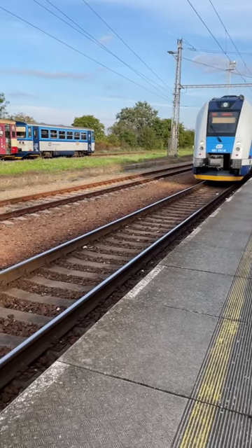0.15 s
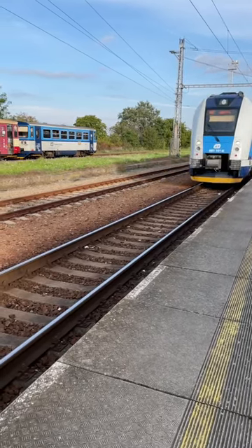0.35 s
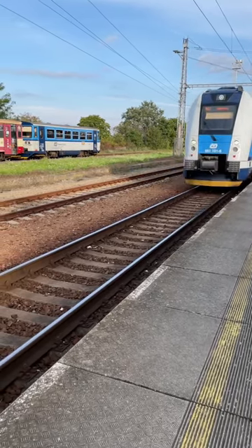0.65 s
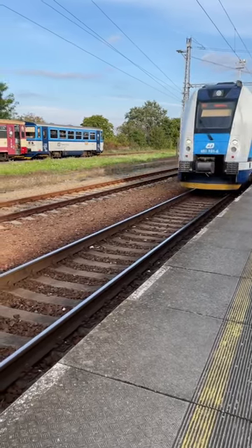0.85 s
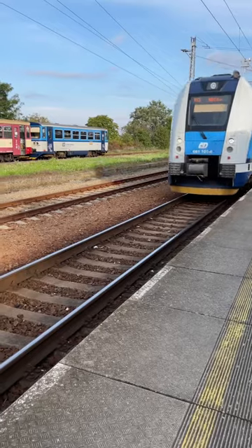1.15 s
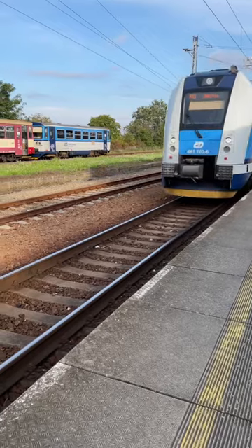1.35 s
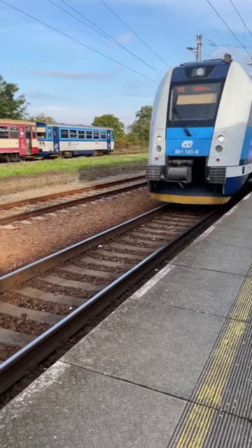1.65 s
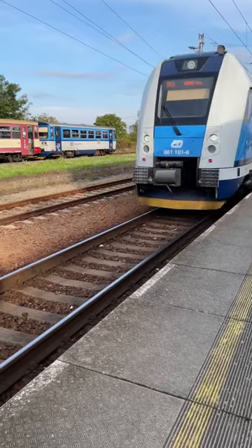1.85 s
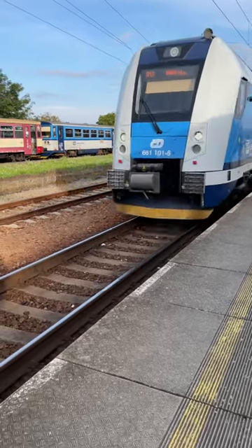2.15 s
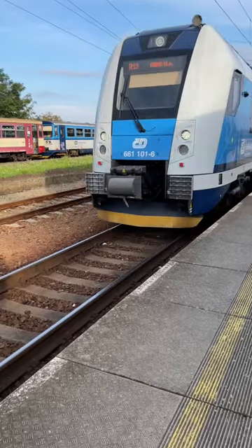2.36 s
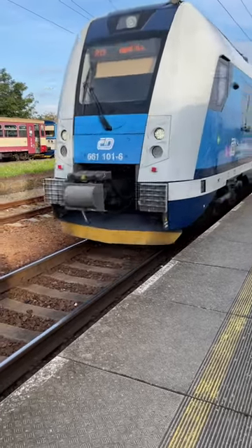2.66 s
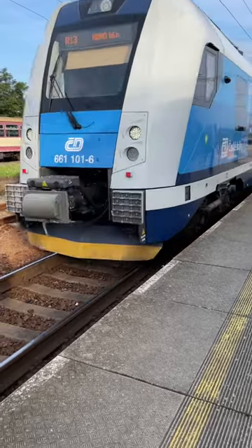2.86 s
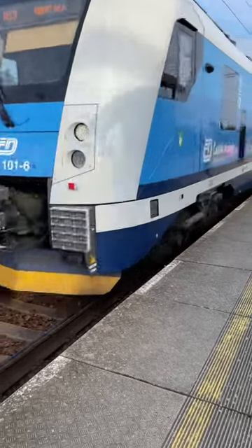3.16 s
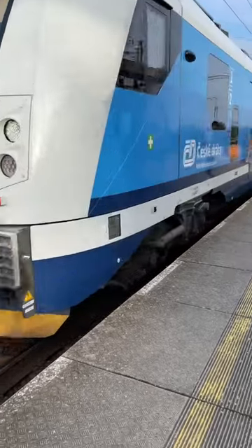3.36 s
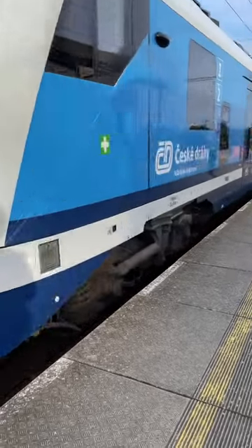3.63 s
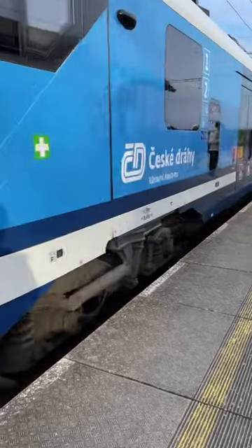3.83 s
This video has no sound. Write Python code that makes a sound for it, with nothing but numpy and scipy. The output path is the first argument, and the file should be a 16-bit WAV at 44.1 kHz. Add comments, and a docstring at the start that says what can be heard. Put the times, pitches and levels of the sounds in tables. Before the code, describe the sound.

Electric train arriving and passing close by, rumbling roar swelling, rail humming, whine sliding down in pitch

```python
"""A steady roar, a rail hum and a high motor whine come first; the roar grows as an electric train
rolls into an open-air platform, and the whine sags in pitch as the front passes. Gear squeaks,
thumps and a bird's chirps come and go. The roar is filtered noise, the whine, hum and squeaks are
sines that wander, the thumps are short low pulses and the bird is a set of gliding sines.
Left and right differ in timing, level and likeness from pitch to pitch."""
import sys
import numpy as np
from scipy import signal
from scipy.fft import rfft, irfft, next_fast_len
from scipy.io import wavfile

SR = 44100
rng = np.random.default_rng(int(sys.argv[2]) if len(sys.argv) > 2 else 0)


def wav_out(sig):
    """Save sig, one row per channel (or a flat mono array), as 16-bit PCM at SR to the path in sys.argv[1]."""
    wavfile.write(sys.argv[1], SR, np.round(np.clip(np.atleast_2d(sig).T, -1, 1) * 32767).astype(np.int16))


N = 175959
T = np.arange(N) / SR  # time of every sample, in seconds

# Loudness of the roar in four pitch zones; only the swings around each column's mean are used:
# (time [s], middle [dB], bass [dB], low [dB], treble [dB])
ROLL_LEVELS = [(0.0, -38.5, -43, -30, -50), (0.04, -39.5, -46.5, -32, -51), (0.31, -38, -41.5, -32, -50),
               (0.61, -38, -42, -33, -50), (1.1, -37, -36.5, -31, -47.5), (2.9, -30, -35.5, -30, -44),
               (3.26, -29.5, -34, -28, -43), (3.37, -30, -34, -29, -43.5), (3.83, -25.5, -38.5, -28, -44),
               (3.97, -27, -32.5, -22, -43.5), (3.99, -25.5, -40, -27, -44)]
# Centres of those zones, in the same order as the columns: (centre [Hz])
ROLL_ZONES = [654, 65, 200, 4000]
# Tone colour of the roar, before a small overall trim: (pitch [Hz], level [dB per Hz])
ROLL_COLOURS = [(25, -80), (45, -49.5), (80, -52), (130, -48), (220, -49), (400, -56.5), (700, -62.5),
                (1200, -71), (2300, -73.5), (3600, -83.5), (5200, -79.5), (7000, -90), (9000, -84),
                (11000, -85), (12500, -103.0), (13500, -119.6)]
# How strongly the roar flickers: (pitch [Hz], flicker [dB])
ROLL_FLICKER = [(60, 0.6), (800, 1.68), (1500, 1.0), (4000, 0.9)]
# Motor whine: (time [s], pitch [Hz], level [dB], extra level of the fundamental [dB])
MOTOR_WHINE = [(0, 1544, -53, 6), (.5, 1545, -51, 5), (1.3, 1542, -48.5, 0.5), (2.0, 1544, -49, 0),
               (2.5, 1544, -47, 7.5), (2.85, 1542, -45, 2), (3.1, 1509, -45.5, 6.5),
               (3.45, 1463, -43.5, -2), (3.75, 1419, -39.5, 0.5), (3.99, 1393, -40, -2)]
# Whine harmonics: (multiple of the pitch, level against the whine [dB], swell [dB per s])
WHINE_HARMONICS = [(1, 0, 0.1), (2, 5, 0.1), (3, -10, 1.4), (4, -12, 1.2), (5, -10, 1.2), (6, -17, 1.4),
                   (7, -22, 2), (8, -46, 7)]
# Blur of each whine harmonic: (blur [Hz])
WHINE_BLURS = [22, 41, 40, 46, 50, 60, 65, 70]
# Steadiness of each whine harmonic: (steady share [0-1])
WHINE_STEADY = [.5, .32, .25, .25, .25, .25, .25, .25]
# Main rail hum: (time [s], pitch [Hz], level [dB])
RAIL_HUM = [(0.0, 341, -43), (0.05, 344.3, -34), (0.64, 344.5, -35.5), (2.32, 342.6, -30.5),
            (2.38, 345.4, -45), (2.52, 344.5, -28), (3.02, 344.8, -26), (3.05, 344.0, -31),
            (3.22, 343.6, -28), (3.27, 347.4, -44.5), (3.33, 342.9, -24.5), (3.85, 342, -26.5),
            (3.99, 339.2, -29.5)]
# Fainter tones of steady pitch: (pitch [Hz], level at the start [dB], blur [Hz], swell [dB per s])
FAINT_TONES = [(122, -43, 6, 1.8), (492, -45, 9, 1.6), (979, -60, 12, 3), (1405, -62, 40, 5)]
# Thin high tone: (time [s], level [dB])
THIN_TONE = [(0, -49.5), (.2, -55.5), (1.3, -57), (1.45, -47), (1.7, -54.5), (2.5, -42), (2.85, -53.5),
             (3.4, -50.5), (3.99, -51)]
# Brief rings of wheel or rail: (start [s], length [s], pitch [Hz], level [dB])
WHEEL_RINGS = [(0.03, .18, 785, -48), (2.3, .3, 975, -45), (2.84, .05, 925, -38), (2.89, .1, 917, -30),
               (3.02, .06, 912, -39), (3.28, .12, 870, -41), (3.62, .35, 230, -31), (3.85, .14, 490, -33)]
# Gear squeaks: (start [s], length [s], start pitch [Hz], level [dB],
# second harmonic below the first [dB], share of length spent rising [0-1])
GEAR_SQUEAKS = [(0.496, .045, 2015, -44, 26, 0.28), (0.532, 0.0503, 1980, -45.5, 25.5, .3),
                (0.924, .045, 2014, -47, 23, .6), (0.982, .035, 2000, -43.5, 26, 0.45),
                (1.009, 0.0488, 1969, -43, 26, 0.28), (1.44, 0.0867, 2012, -38, 14, 0.84),
                (1.53, .07, 1978, -47, 21, 0.45), (2.543, .11, 1985, -35, 15, .25),
                (2.688, 0.067, 1945, -35.5, 9, 0.085), (3.112, .05, 2000, -37, 15, .25),
                (3.167, 0.034, 2009, -28.5, 16, .65), (3.203, 0.047, 1972, -27.5, 16, .35),
                (3.245, .06, 1956, -43, 22, .3), (3.774, 0.031, 2060, -32.5, 15.5, .6),
                (3.8, 0.049, 2020, -34.5, 18, 0.26), (3.847, .05, 1950, -25.5, 15, 0.49),
                (3.9, 0.042, 1990, -39.5, 12.5, .25)]
# Wheel thumps: (time [s], peak level [dB], pitch [Hz])
WHEEL_THUMPS = [(0.829, -19, 111.4), (1.111, -16, 78), (1.59, -16, 170), (2.237, -14, 78),
                (2.761, -17.5, 60.2), (2.765, -17.5, 180)]
# Bird chirps, before a shared lift: (start [s], length [s], start pitch [Hz], level [dB])
BIRD_CHIRPS = [(1.53, .04, 4170, -55), (1.72, 0.038, 4000, -54), (1.937, .05, 4000, -48.5),
               (2.068, 0.036, 3960, -50.5)]
# Stereo image by pitch; left and right are exact opposites around 9.3-11 kHz:
# (pitch [Hz], left lead [radians], left minus right [dB], likeness [0-1])
STEREO_IMAGE = [(80, 0, 0, .997), (130, 0, .5, .996), (250, -.15, 2.2, .99), (430, -.45, 4.7, .94),
                (800, -.9, 0, .85), (1000, -.6, -3, .72), (1400, 0, -.7, .97), (2000, .1, 0, .98),
                (3000, .5, -3, .75), (3500, .8, 0, .68), (4550, .6, 1, .6), (4880, 3.14, 0, .8),
                (5250, 6.5, 0, .55), (6000, 6.9, 0, .75), (8500, 8.5, 0, .75), (9300, 9.42, 0, 1),
                (11000, 9.42, 0, 1), (11600, 9.8, 0, .85), (12500, 10, 0, .5)]

ROLL_TRIM_DB, TOP_GAIN_DB_PER_S = -1.5, 7  # the top brightens as the train nears
HUM_BLUR_HZ, HUM_STEADY = 12, .77
TONE_STEADY_HZ = 4  # divided by the blur, so narrower tones are steadier
THIN_HZ, THIN_BLUR_HZ, THIN_STEADY = 1807, 7, .72
RING_BLUR_HZ, RING_STEADY = 14, .75
SQUEAK_SAG_HZ_PER_S, SQUEAK_THIRD_DB = 700, -5  # third harmonic against the second
SQUEAK_BLUR_HZ, SQUEAK_STEADY = 58, .68  # for the first harmonic
THUMP_HALF_S = .013
CHIRP_RISE_HZ_PER_S, CHIRP_LIFT_DB = 3000, 5.0
SCATTER_S = .06
LOW_CUT_HZ, AIR_LOSS_HZ, CUTOFF_HZ = 46, 11500, 13884


def amp(db):
    """Turn decibels into a plain multiplier."""
    return 10 ** (np.asarray(db) / 20)


def rms_one(x):
    """Scale a signal to an rms (average strength) of 1."""
    return x / np.sqrt(np.mean(np.abs(x) ** 2) + 1e-20)


def columns(rows, at, warp=lambda v: v):
    """Read every column after the first at the given places, with straight lines between rows."""
    key, *cols = np.transpose(rows)
    return [np.interp(warp(at), warp(key), c) for c in cols]


def drift(rate_hz):
    """Slow random wandering with rms 1: white noise smoothed by a two-step low-pass."""
    r = np.exp(-2 * np.pi * rate_hz / SR)
    noise = rng.standard_normal(N + SR // 2)
    slow = signal.lfilter([1], [1, -2 * r, r * r], noise)
    return rms_one(slow[SR // 2:])  # drop the filter's first half second


def tone(hz, blur_hz, steady=0.):
    """A sine whose strength and phase wander, as narrow noise does; rms 1."""
    wander = steady + (1 - steady) * (drift(blur_hz) + 1j * drift(blur_hz))
    phase = 2 * np.pi * np.cumsum(hz + 0 * T) / SR
    return rms_one(np.real(wander * np.exp(1j * phase)))


def swell(start, length, rise=0.54):
    """A quarter-sine rise and fall; rise is the share of the length spent rising."""
    along = (T - start) / length
    ramp = np.minimum(along / rise, (1 - along) / (1 - rise))
    return np.sin(np.pi / 2 * np.clip(ramp, 0, 1))


def rolling():
    """Wheel-on-rail roar: half-octave noise bands that swell with their zone and flicker."""
    swings_db = np.array([c - c.mean() for c in columns(ROLL_LEVELS, T)])
    zones = np.sort(ROLL_ZONES)
    white = rng.standard_normal((2, N))
    edges = 20 * 2 ** np.arange(0, 9.6, .5)
    together = drift(5.1)  # flicker shared by all bands
    out = 0
    for k, (low, high) in enumerate(zip(edges, edges[1:])):
        hz = np.sqrt(low * high)
        band_filter = signal.butter(2, [low, high], "band", fs=SR, output="sos")
        band = signal.sosfilt(band_filter, white[k % 2])  # neighbours use different noise
        colour_db, = columns(ROLL_COLOURS, hz, np.log)
        # how much this band follows each zone
        shares = [np.interp(np.log(hz), np.log(zones), zones == zone) for zone in ROLL_ZONES]
        depth_db, = columns(ROLL_FLICKER, hz, np.log)
        flicker_db = depth_db * (0.26 * together + drift(13.7))
        top_db = (hz > 10000) * TOP_GAIN_DB_PER_S * (T - 3.5)
        out = out + band * amp(colour_db + top_db + shares @ swings_db + flicker_db)
    return out * np.sqrt(SR / 2) * amp(ROLL_TRIM_DB)  # the root turns levels per Hz into noise strength


def whine():
    """Traction motor whine: blurred harmonics that follow one changing pitch."""
    hz, motor_db, first_db = columns(MOTOR_WHINE, T)
    out = 0
    for (k, level_db, swell_db), blur_hz, steady in zip(WHINE_HARMONICS, WHINE_BLURS, WHINE_STEADY):
        db = motor_db + level_db + swell_db * T + (k == 1) * first_db
        out = out + amp(db) * tone(k * hz, blur_hz, steady)
    return out


def rail_tones():
    """Humming rails: a main hum, fainter narrow tones and brief rings of wheel or rail."""
    hum_hz, hum_db = columns(RAIL_HUM, T)
    out = amp(hum_db) * tone(hum_hz, HUM_BLUR_HZ, HUM_STEADY)
    for hz, db, blur_hz, swell_db in FAINT_TONES:
        out += amp(db + swell_db * T) * tone(hz, blur_hz, TONE_STEADY_HZ / blur_hz)
    thin_db, = columns(THIN_TONE, T)
    out += amp(thin_db) * tone(THIN_HZ, THIN_BLUR_HZ, THIN_STEADY)
    for start, length, hz, db in WHEEL_RINGS:
        out += amp(db) * swell(start, length) ** .5 * tone(hz, RING_BLUR_HZ, RING_STEADY)
    return out


def squeaks():
    """Running gear squeaks: rough stick-slip chirps that sag in pitch, with two overtones."""
    start, length, start_hz, db, below_db, rise = (c[:, None] for c in np.transpose(GEAR_SQUEAKS))
    shapes = amp(db) * swell(start, length, np.clip(rise, .05, .95)) ** 0.75
    pitches = start_hz - SQUEAK_SAG_HZ_PER_S * np.clip(T - start, 0, length)
    # the loudest squeak at each moment sets the pitch
    loudest = shapes.argmax(axis=0)[None]
    hz = np.take_along_axis(pitches, loudest, axis=0)[0]
    # higher harmonics are blurrier and less steady
    first, second, third = (tone(k * hz, k ** .5 * SQUEAK_BLUR_HZ, SQUEAK_STEADY / k ** .5)
                            for k in range(1, 4))
    overtones = second + amp(SQUEAK_THIRD_DB) * third
    return shapes.sum(axis=0) * first + (shapes * amp(-below_db)).sum(axis=0) * overtones


def thumps():
    """Wheels crossing uneven rail: soft low pushes, each a cosine under a bell-shaped bump."""
    out = 0
    for time, db, hz in WHEEL_THUMPS:
        bump = np.exp(-((T - time) / THUMP_HALF_S) ** 2)
        out = out - amp(db) * bump * np.cos(2 * np.pi * hz * (T - time))
    return out


def bird():
    """Bird chirps: short sine whistles that glide upwards."""
    out = 0
    for start, length, hz, db in BIRD_CHIRPS:
        since = T - start
        cycles = (hz + CHIRP_RISE_HZ_PER_S * since / 2) * since  # half, because pitch adds up over time
        out = out + amp(db + CHIRP_LIFT_DB) * swell(start, length) * np.sin(2 * np.pi * cycles)
    return out


def stereo(x):
    """Each side is the direct sound plus or minus its scatter, with a lead and level set by pitch."""
    size = next_fast_len(N + SR // 4)
    hz = np.arange(size // 2 + 1) * SR / size + 1  # the extra 1 avoids log of zero
    lead, balance_db, alike = columns(STEREO_IMAGE, hz, np.log)
    alike = np.clip(alike, 0, 1)
    tail = np.arange(SR // 4) / SR
    scatter = rfft(rng.standard_normal(len(tail)) * np.exp(-tail / SCATTER_S), size)
    scatter = scatter / np.abs(scatter)  # keep its phase only
    sides = np.array([[1], [-1]])  # left, right
    mix = np.sqrt((1 + alike) / 2) + sides * np.sqrt((1 - alike) / 2) * scatter
    both = mix * amp(sides * balance_db / 2) * np.exp(sides * .5j * lead)
    return irfft(rfft(x, size) * both, size)[:, :N]


def scene():
    """All sources add up and are spread into left and right."""
    return stereo(rolling() + whine() + rail_tones() + squeaks() + thumps() + bird())


def record(dry):
    """Deep bass is cut, the top rolls off gently and then ends steeply."""
    dry = signal.sosfilt(signal.butter(2, LOW_CUT_HZ, "high", fs=SR, output="sos"), dry)
    dry = signal.sosfilt(signal.butter(3, AIR_LOSS_HZ, fs=SR, output="sos"), dry)
    return signal.sosfilt(signal.cheby2(20, 60, CUTOFF_HZ, fs=SR, output="sos"), dry)


dry = scene()
out = record(dry)
wav_out(out)
```